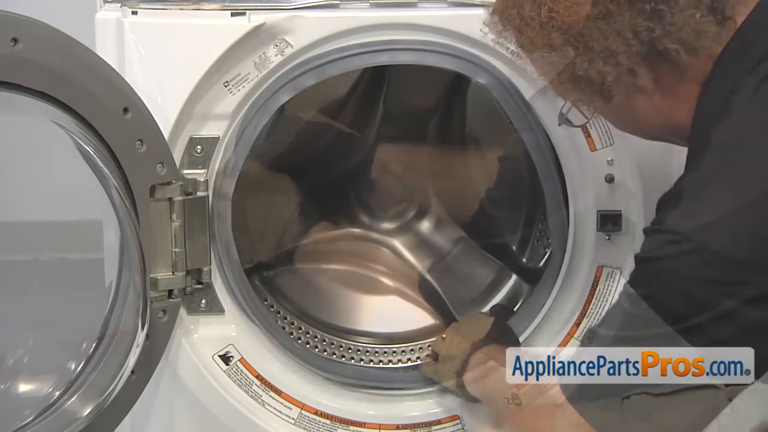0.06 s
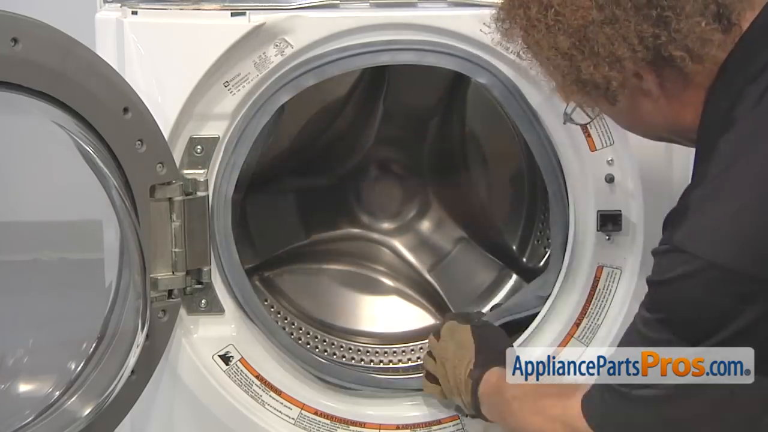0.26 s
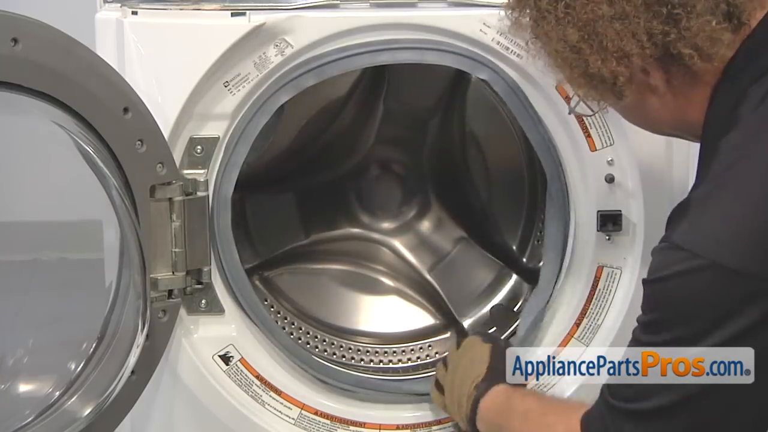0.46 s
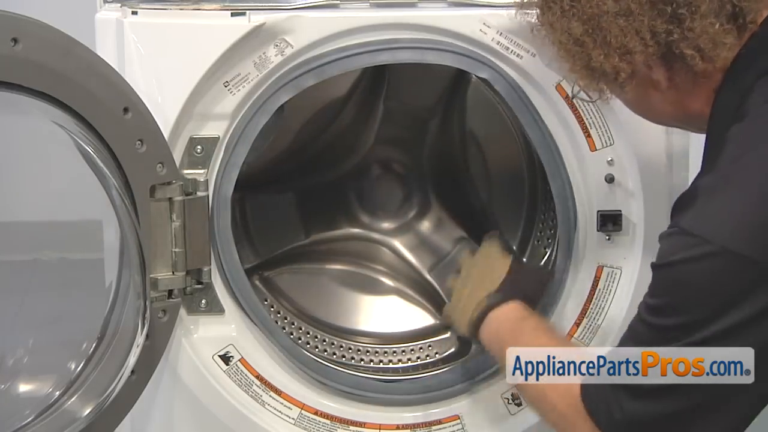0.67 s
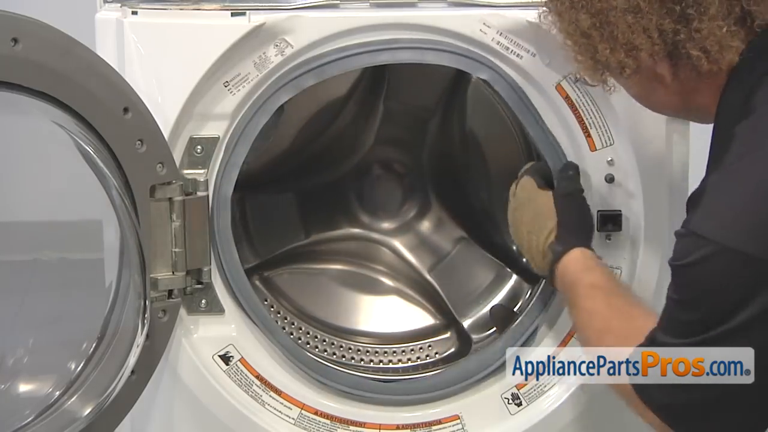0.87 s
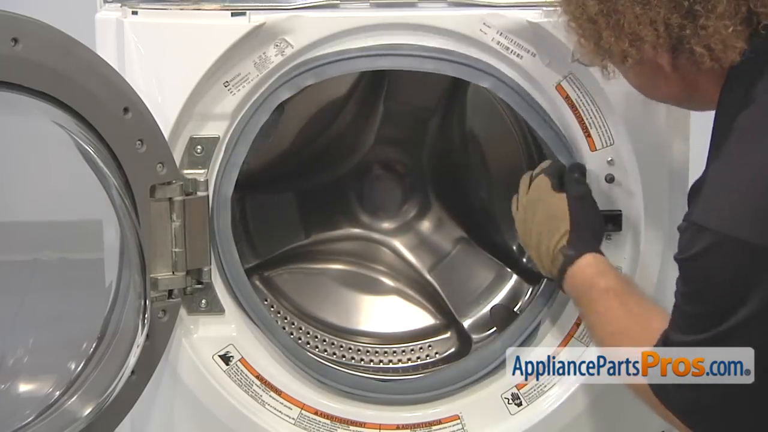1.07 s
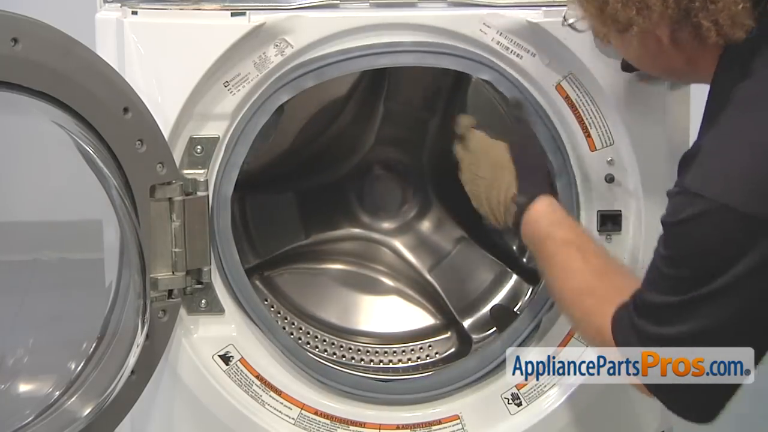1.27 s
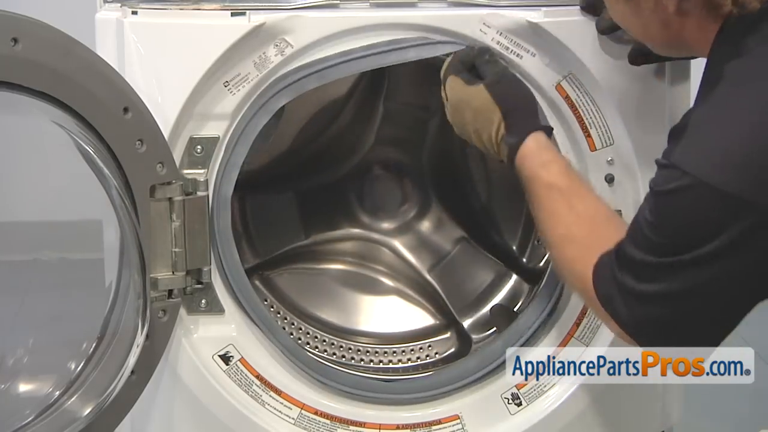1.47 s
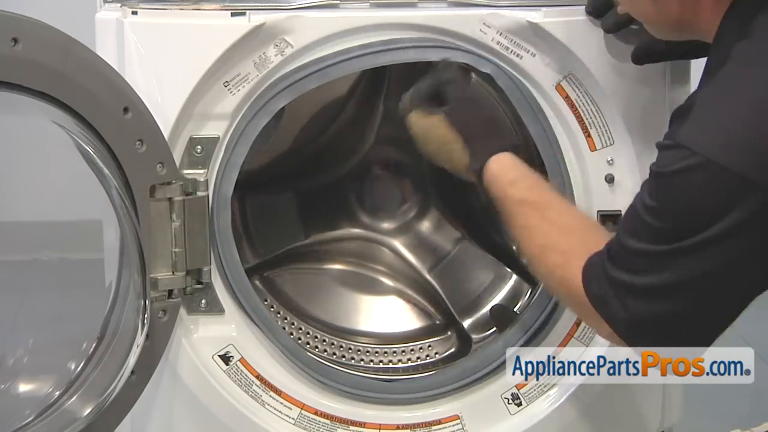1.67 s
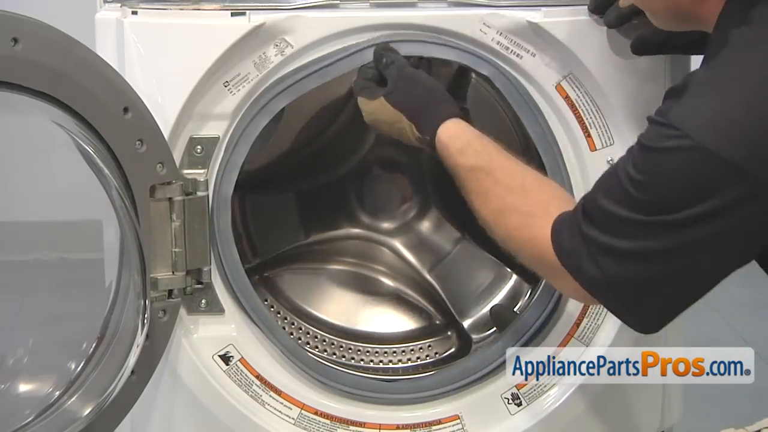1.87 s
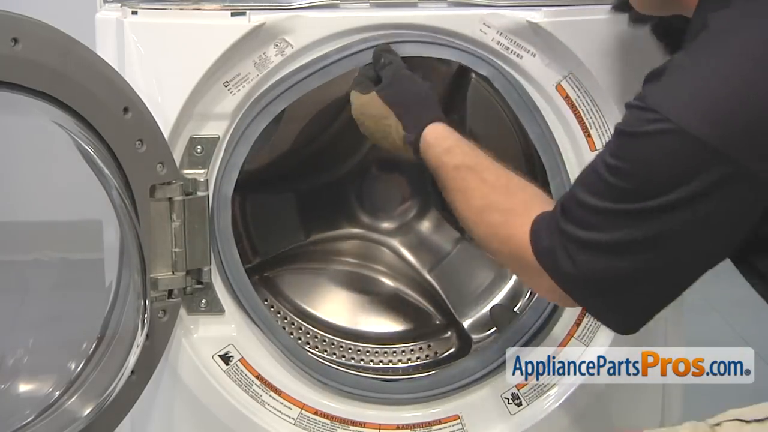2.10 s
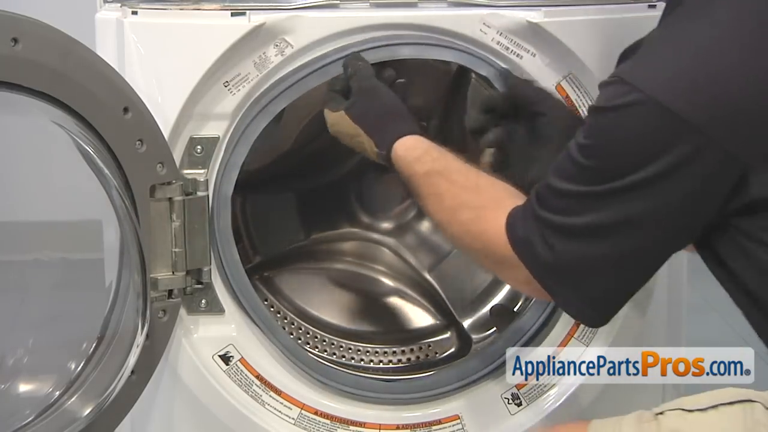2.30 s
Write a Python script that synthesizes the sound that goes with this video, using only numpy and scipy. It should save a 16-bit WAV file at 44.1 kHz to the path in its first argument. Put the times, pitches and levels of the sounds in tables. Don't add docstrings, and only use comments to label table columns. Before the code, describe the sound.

Irregular dull knocks on thin steel and a hollow drum, strongest in the first half, then a deep soft boom, light glove brushing and a short squeaky rub, heard close over quiet low room hum.

```python
import sys
import numpy as np
from scipy import signal
from scipy.fft import rfft, irfft
from scipy.io import wavfile
from scipy.ndimage import uniform_filter1d

SR = 44100
rng = np.random.default_rng(int(sys.argv[2]) if len(sys.argv) > 2 else 0)


def to_linear_factor(level_db):
    exponent = np.asarray(level_db, float) / 20
    return 10 ** exponent


def log_audio(samples):
    frames = np.atleast_2d(samples).T
    limited = np.clip(frames, -1, 1)
    pcm = np.round(limited * 32767).astype(np.int16)
    wavfile.write(sys.argv[1], SR, pcm)


N = 105840


def evened(x):
    return x / np.sqrt(np.mean(x ** 2) + 1e-20)


def read(points, hz):
    f, value = np.transpose(points)
    return np.interp(np.log(hz + 1), np.log(f + 1), value)


def add(mix, s, sound):
    part = mix[round(s * SR):][:len(sound)]
    part += sound[:len(part)]


def coloured(x, db_at):
    hz = np.fft.rfftfreq(len(x), 1 / SR)
    return irfft(rfft(x) * to_linear_factor(db_at(hz)), len(x))


# frequency in Hz, density in dB per Hz.
AIR_SPECTRUM = [(12, -108), (20, 5), (83, -1.5), (285, -12.5), (459, -21), (718, -22.5), (3160, -36),
                (13200, -39.5), (16000, -37.5)]


def air():
    frames, hz = N // 256 + 5, np.fft.rfftfreq(1024, 1 / SR)
    real, imag, patches = rng.standard_normal((frames, 513, 3)).T
    patches = uniform_filter1d(patches, size=12, axis=0)
    patches = evened(uniform_filter1d(patches, size=14, axis=1))
    swell = evened(uniform_filter1d(rng.standard_normal(frames), size=8))
    rumble_db = -1 * swell / (1 + (hz[:, None] / 400) ** 2)
    level_db = read(AIR_SPECTRUM, hz)[:, None] + 0.5 * patches + rumble_db
    noise = signal.istft((real + 1j * imag) * to_linear_factor(level_db), nperseg=1024, noverlap=768)[1][:N]
    return to_linear_factor(-56) * evened(noise)


# frequency in Hz, decay time T60 in seconds.
ROOM_DECAY = [(100, 0.87), (500, 0.15), (2000, 0.21), (6000, 0.12), (14000, 0.063)]


def room(x):
    echoes = np.zeros(SR // 2)
    at = np.arange(200, SR // 2 - 20, 20)
    echoes[at + rng.integers(0, 20, len(at))] = rng.choice([-1., 1.], len(at))
    hz, t, z = signal.stft(echoes, SR, nperseg=256)
    fade = to_linear_factor(-60 * t / read(ROOM_DECAY, hz)[:, None])
    tail = signal.istft(z * fade, SR, nperseg=256)[1]
    return signal.fftconvolve(x, tail / np.linalg.norm(tail))[:N]


def swings(table):
    out, t = np.zeros(N), np.arange(SR // 2) / SR
    for s, db, hz, t60, rise in table:
        envelope = to_linear_factor(db + 6.5 - 60 * t / t60) * (1 - np.exp(-(t / rise) ** 2))
        add(out, s, -envelope * np.sin(2 * np.pi * hz * t))
    return out


# start in seconds, peak level in dB, frequency in Hz,
# decay time T60 in seconds, rise time in seconds.
CABINET_BOOMS = [(0.113, -59, 78, 0.69, 0.0036), (0.2605, -32.5, 93.4, 0.11, 0.0048),
                 (0.2945, -43.5, 94.7, 0.24, .005), (.454, -50, 58, .3, 0.0091),
                 (0.457, -40, 94.6, 0.37, 0.0062), (.578, -32, 96.6, 0.19, 0.0068),
                 (.597, -51, 89.4, 0.076, 0.0064), (.58, -43, 52, 0.3, 0.012),
                 (.72, -53.5, 72.6, 0.58, 0.01), (0.802, -56, 64.4, 0.26, 0.0039),
                 (0.936, -49.5, 84, 0.22, 0.0059), (1.056, -39, 79, 0.12, 0.0075),
                 (1.231, -54, 72, 0.8, .008), (1.329, -63, 62, 0.19, 0.0091),
                 (1.476, -49, 92.7, 0.24, 0.005), (1.559, -23, 79.3, 0.087, 0.017),
                 (1.737, -41.5, 77.6, 0.075, 0.0044), (1.957, -48, 87.3, 0.35, 0.0029),
                 (2.0785, -46.5, 115, 0.14, 0.0021), (2.245, -73, 70.6, 0.1, 0.0057)]


def booms():
    return swings(CABINET_BOOMS)


def ring(modes, extra_db=0, tune=1, signs=None, length=1):
    t = np.arange(SR // 4)[:, None] / SR
    hz, db, t60 = np.transpose(modes)
    if signs is None:
        signs = (-1.) ** np.arange(len(hz))
    fade = to_linear_factor(db + extra_db - 60 * t / t60 / length)
    out = (fade * np.sin(2 * np.pi * hz * tune * t) * signs).sum(1)
    out *= 1 - np.exp(-t[:, 0] / 0.0005)
    return out / abs(out).max()


# frequency in Hz, level in dB, decay time T60 in seconds.
PANEL_MODES = [(596, 0, .065), (678, -1, .08), (835, -5, .06), (985, -5, .05), (1100, -3, .06),
               (1330, -5, .055), (1500, -9, .04), (1750, -11, .04), (2290, -16, .03), (2800, -18, .03)]
# frequency in Hz, level in dB, decay time T60 in seconds.
DRUM_MODES = [(170.3, -9, 0.091), (214, -9.5, 0.074), (252, -7.5, 0.085), (281.8, -3, 0.067),
              (332, 1, 0.049), (381.6, -4.5, 0.074), (426, 0.5, 0.015), (503, 2, 0.064)]
# middle in seconds, spread in seconds, glove hiss in dB,
# scrape on the panel in dB, upper hiss hump over the lower in dB.
STROKES = [(0.066, 0.045, -70.5, -63.5, -2), (0.252, 0.052, -67, -96, -5), (0.544, 0.064, -69.5, -59, 1),
           (0.678, 0.025, -71.5, -71.5, 4), (.84, 0.015, -70.5, -99, -6), (0.969, 0.013, -77, -60, -8),
           (1.039, 0.031, -71, -71, -7), (1.242, 0.017, -62.5, -66.5, -7), (1.37, 0.034, -80, -71, -9),
           (1.51, 0.03, -78, -64.5, 2), (1.558, 0.0034, -80, -57, -8), (1.708, 0.013, -69, -63.5, -6),
           (1.8, 0.039, -77.5, -81, 14), (1.949, 0.026, -68, -65.5, -6), (2.106, 0.013, -64.5, -49, 18),
           (2.06, 0.012, -79, -64.5, 17), (2.15, 0.0086, -93, -91, 15), (2.311, 0.016, -58.5, -70, 2)]


def rubs():
    t, hiss, press = np.arange(N) / SR, np.zeros(N), np.zeros(N)
    flutter = evened(uniform_filter1d(rng.standard_normal(N), size=60))
    white = rng.standard_normal(N) * to_linear_factor(3.3 * flutter)

    def hump(centre_hz):
        return coloured(white, lambda f: np.maximum(-6 * (np.log(f / centre_hz + 1e-9) / .14) ** 2, -60))

    low, high = hump(6600), hump(11300)
    wide = to_linear_factor(-2) * coloured(white, lambda f: -40. * (f < 700))
    for s, spread, hiss_db, scrape_db, upper_db in STROKES:
        stroke = np.exp(-.5 * ((t - s) / spread) ** 2)
        blend = wide + low * to_linear_factor(-upper_db / 2) + high * to_linear_factor(upper_db / 2)
        hiss += to_linear_factor(hiss_db) * stroke * evened(blend)
        press += to_linear_factor(scrape_db) * stroke
    slips_per_s, slip_db, rasp_hz = 2500, 2.5, 3500
    slips = (rng.random(N) < slips_per_s / SR) * to_linear_factor(slip_db * rng.exponential(1, N))
    slips = slips * rng.choice([-1., 1.], N)
    rasp = coloured(slips, lambda f: np.maximum(-9 * np.log(f / rasp_hz + 1e-9) ** 2, -60))
    rasp = to_linear_factor(-11.5) * press * evened(rasp)
    body = ring(PANEL_MODES) + to_linear_factor(-14) * ring(DRUM_MODES)
    scrape = signal.oaconvolve(evened(slips) * press, body / np.linalg.norm(body))[:N]
    return hiss + rasp + scrape


# frequency in Hz, level in dB.
BOWED_TONES = [(521, -13), (592, -1), (702, 1), (760, -9), (835, -3), (1101, -8), (1338, -8), (1600, -20),
               (1790, -19), (2060, -24), (2280, -22), (2790, -28)]


def squeak():
    top_s, swell_s, t60_s, squeak_db = 2.115, 0.016, 0.073, -37.5
    hz, db = np.transpose(BOWED_TONES)
    t = np.arange(N)[:, None] / SR - top_s
    age = t * np.maximum(hz / hz[2], 1) ** .8
    level_db = np.where(t < 0, -6 * (age / swell_s) ** 2, -60 * age / t60_s)
    tones = to_linear_factor(squeak_db + db + level_db) * np.cos(2 * np.pi * hz * t)
    return -tones.sum(1)


# start in seconds, peak level in dB,
# frequency in Hz, decay time T60 in seconds, rise time in seconds.
SINGING_PATCHES = [(.2455, -50, 1280, 0.041, 0.00091), (.2455, -43, 787, 0.028, 0.00092),
                   (.252, -53, 443, .06, .003), (.288, -49.5, 680, 0.077, 0.0058),
                   (.291, -61.5, 1310, 0.038, .004), (.4535, -48.5, 1078, 0.043, 0.00053),
                   (.4535, -49, 1498, 0.047, 0.0013), (.574, -40, 542, .03, 0.00057),
                   (.574, -43, 966, 0.057, 0.0015), (.5745, -55, 2413, 0.089, .001),
                   (.5745, -49, 1697, 0.06, 0.0005), (1.476, -46, 581, 0.03, 0.00062),
                   (1.477, -56, 1390, 0.032, 0.0022), (1.492, -53.5, 710, .04, .003),
                   (1.499, -56, 860, 0.056, 0.0026), (1.553, -47, 281, 0.067, 0.0044),
                   (.247, -38.5, 287, 0.072, 0.0032), (.4533, -41.5, 230, 0.045, 0.0012),
                   (.5738, -34, 285.6, 0.058, .0015), (.585, -46, 167.7, .15, .005),
                   (.5744, -41.5, 3070, 0.028, 0.00046), (.454, -51, 4284, .04, 0.0013),
                   (1.2556, -56.5, 1607, 0.024, 0.00051), (1.4762, -61, 1160, 0.024, .001),
                   (.957, -63, 2140, .04, .003), (.968, -57.5, 780, .06, 0.0033),
                   (.31, -52, 189.5, 0.24, 0.0093), (1.957, -60, 1910, 0.029, 0.0017),
                   (2.079, -52.5, 1310, .06, 0.0037)]


def patches():
    return swings(SINGING_PATCHES)


def favour(modes, hz, octaves):
    distance = np.log2(np.transpose(modes)[0] / hz) / octaves
    return np.maximum(-6 * distance ** 2, -24)


# start in seconds, panel ring in dB, hollow drum in dB,
# favoured panel frequency in Hz, spread in octaves.
FINGER_TAPS = [(0.2458, -53, -39, 1210, 1.2), (0.294, -77, -67, 675, 0.13), (0.4535, -53, -53.5, 1230, 1.2),
               (0.5287, -56, -57, 886, 0.65), (.552, -45.5, -50.5, 690, 0.45),
               (0.5702, -33.5, -43, 1200, 0.72), (0.574, -58, -33.5, 1210, 0.44),
               (0.665, -65, -82, 1120, 0.35), (0.9166, -57.5, -56.5, 1020, 0.71),
               (0.966, -71, -61, 810, 0.47), (.978, -88, -60, 900, 0.66), (1.026, -46.5, -47, 775, 1.3),
               (1.1758, -58.5, -53.5, 750, 1.6), (1.2555, -36, -47, 570, 1.05),
               (1.4756, -45, -62, 606, 0.99), (1.495, -67, -67, 810, 0.14), (1.549, -56, -50, 1310, 0.19),
               (1.561, -52, -48.5, 870, 0.35), (1.715, -47, -52, 626, 1.34), (1.882, -77, -96, 690, 1.2),
               (1.955, -59.5, -84, 1360, 0.51), (2.075, -51, -54.5, 590, 0.82)]
# favoured drum frequency in Hz, spread in octaves,
# panel ring length as a share of the undamped one.
TAP_GRIPS = [(272, 0.7, 1), (300, 0.72, 0.5), (248, 0.42, 0.87), (298, 1, 1), (300, 1.2, 1),
             (400, 0.7, 0.63), (332, 2.2, 1), (300, 1, 0.91), (297, 0.4, 0.73), (300, 0.87, 0.9),
             (297, 0.58, 1), (312, 1.04, 0.8), (250, .8, 0.59), (264, 0.65, 0.92), (278, 1, 0.7),
             (300, 1.1, 0.39), (278, 1.6, 0.46), (260, 0.31, 0.71), (270, 0.4, 0.93), (300, 1.7, 1),
             (300, 1, 0.89), (395, 0.72, 0.45)]


def taps():
    scatter_db, detune = 1.5, .025
    out = np.zeros(N)
    n_panel, n_drum = len(PANEL_MODES), len(DRUM_MODES)
    luck = rng.standard_normal((len(FINGER_TAPS), n_panel + 2 * n_drum))
    for tap, grip, odd in zip(FINGER_TAPS, TAP_GRIPS, luck):
        s, ring_db, drum_db, panel_hz, octaves = tap
        drum_hz, spread, length = grip
        panel_luck, drum_luck, tune_luck = np.split(odd, [n_panel, n_panel + n_drum])
        panel_db = favour(PANEL_MODES, panel_hz, octaves) + scatter_db * panel_luck
        add(out, s, to_linear_factor(ring_db + 4.5) * ring(PANEL_MODES, panel_db, length=length))
        weight_db = favour(DRUM_MODES, drum_hz, spread) + scatter_db * drum_luck
        drum = ring(DRUM_MODES, weight_db, 1 + detune * tune_luck, np.sign(drum_luck))
        add(out, s, to_linear_factor(drum_db + 5.5) * drum)
    return out


# frequency in Hz, level in dB.
SNAP_COLOUR = [(200, -10), (800, 8), (2000, -4), (3300, 0), (5200, -9), (7500, -2), (12000, -3),
               (16000, -7)]
# start in seconds, level in dB, brightest frequency in Hz,
# how far it stands out in dB, rise time in seconds.
SEAL_SNAPS = [(0.4537, -38, 7130, 2.5, 0.001), (0.529, -54.5, 4000, 14, 0.0012),
              (0.5702, -38, 3360, 21, 0.00034), (0.5744, -29.5, 3275, 7.5, 0.000019),
              (0.663, -59, 4330, 8, 0.00034), (.978, -60, 2840, 14, 0.0011),
              (1.027, -58.5, 2370, 9, 0.00041), (1.2553, -56.5, 3500, 18, 0.00015),
              (1.477, -59.5, 1610, 20, 0.00036), (1.549, -62.5, 8650, 0, 0.00059),
              (1.56, -58, 2920, 14, 0.00067), (1.715, -55.5, 2830, 2, 0.0018),
              (1.955, -58, 2250, 19, 0.003)]


def snaps():
    crack_t60_s, tail_db, tail_t60_s = 0.0091, -9, 0.076
    click_db, click_t60_s, peak_width = 9, .0055, 0.9
    out, t = np.zeros(N), np.arange(SR // 4) / SR
    noises = rng.standard_normal((len(SEAL_SNAPS), len(t)))
    for (s, db, hz, peak_db, rise), noise in zip(SEAL_SNAPS, noises):
        fade = to_linear_factor(-60 * t / (crack_t60_s + 8 * rise)) + to_linear_factor(tail_db - 60 * t / tail_t60_s)

        def colour_db(f):
            return read(SNAP_COLOUR, f) + peak_db * np.exp(-(np.log(f / hz + 1e-9) / peak_width) ** 2)

        crack = evened(coloured(noise, colour_db))
        add(out, s, to_linear_factor(db) * (1 - np.exp(-t / rise)) * fade * crack)
        click = -np.sin(2 * np.pi * hz * t) * to_linear_factor(click_db - 60 * t / click_t60_s)
        add(out, s, to_linear_factor(db) * np.exp(-rise / 0.0025) * click)
    return out


def scene():
    hands = rubs() + squeak() + patches() + taps() + snaps()
    mono = hands + to_linear_factor(-13) * room(hands) + booms() + air()
    left_db, right_db = -.85, .85
    return mono * to_linear_factor(np.array([[left_db], [right_db]]))


def low_pass(x):
    return signal.sosfilt(signal.butter(12, 16470, fs=SR, output="sos"), x)


def record(dry):
    hiss = signal.lfilter([1, -0.55], 1, rng.standard_normal((2, N + 1)))[:, 1:]
    noisy = dry + to_linear_factor(-76.5) * hiss
    edge = signal.firwin(511, 15950, window=("kaiser", 9), fs=SR)
    mix = signal.oaconvolve(noisy, edge[None], "same")
    return low_pass(mix)


dry = scene()
out = record(dry)
log_audio(out)
```